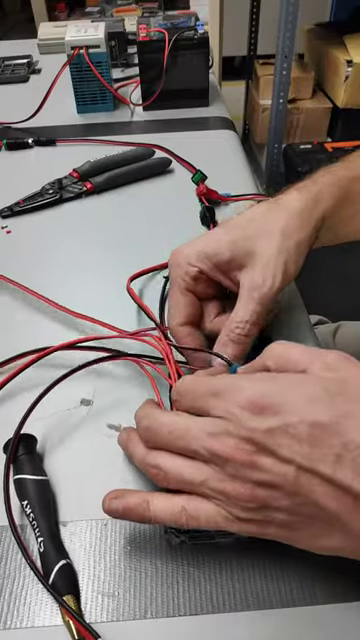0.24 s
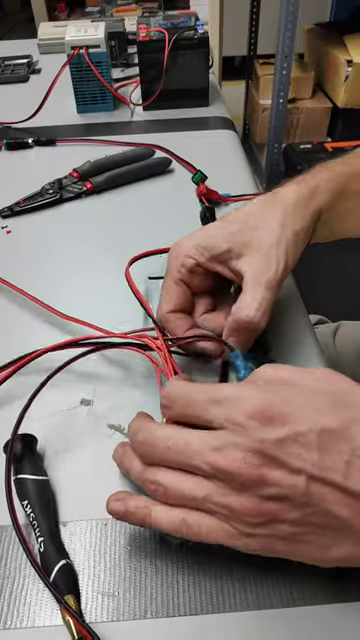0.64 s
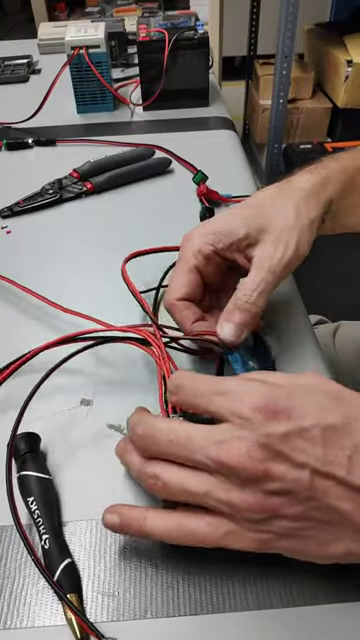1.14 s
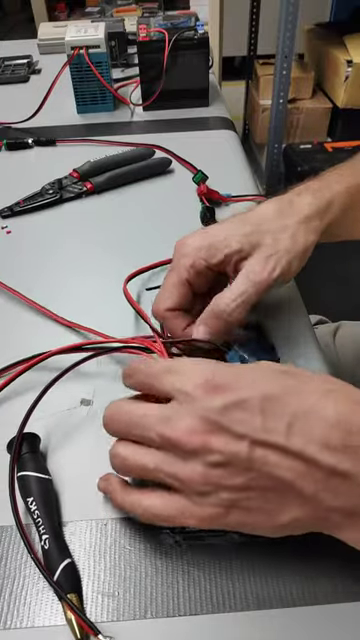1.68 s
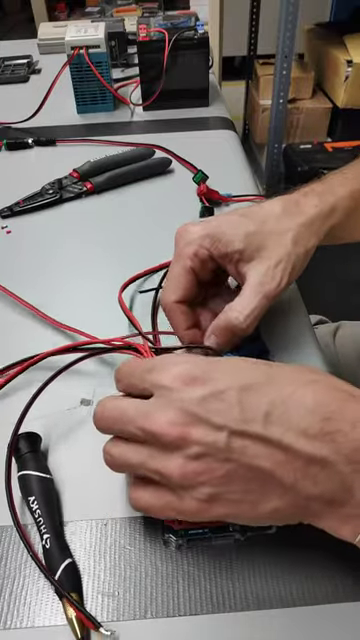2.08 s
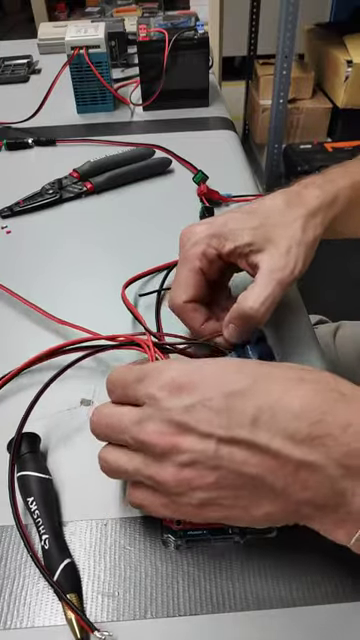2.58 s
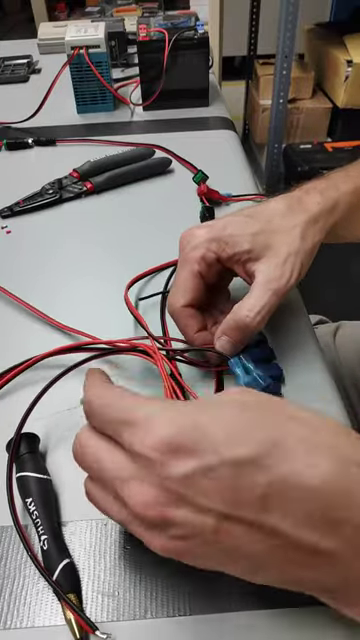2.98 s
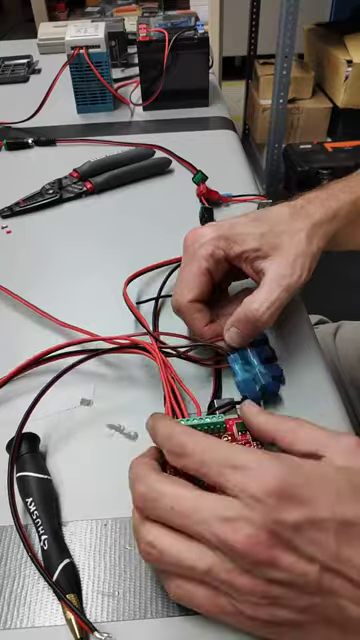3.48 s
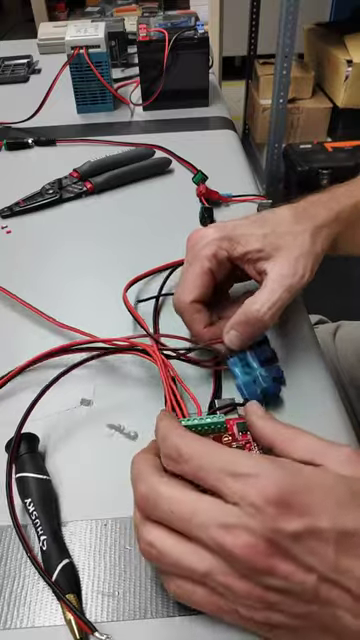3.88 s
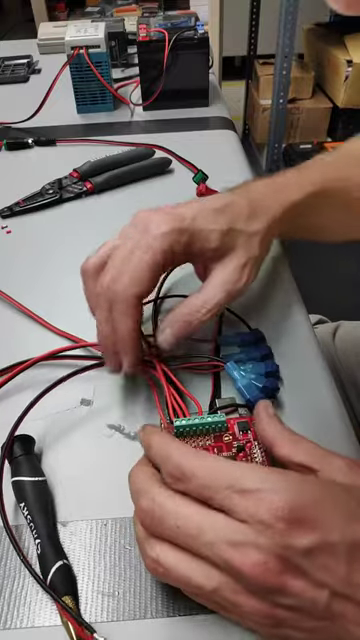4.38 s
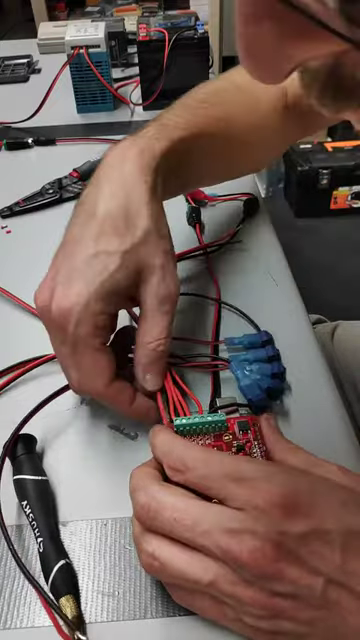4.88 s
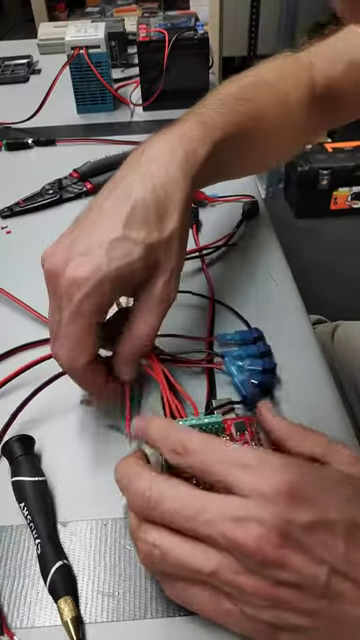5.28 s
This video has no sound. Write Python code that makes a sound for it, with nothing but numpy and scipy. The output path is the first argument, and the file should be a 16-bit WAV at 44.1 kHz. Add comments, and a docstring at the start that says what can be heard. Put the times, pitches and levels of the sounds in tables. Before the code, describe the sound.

Close, quiet wire handling at a bench: thin squeaky rubs, soft board knocks, then one crisp click, over steady humming room tone.

```python
"""Ventilation rumbles in a quiet workshop, the mains hum and a small cooling fan whines, slowly gaining speed.
Close to a phone, fingers rub insulated wires with a thin, high squeak; then come duller wire drags.
Near the end, wire ends tick against a terminal block: a snap and a short decaying ring.
Now and then, mostly near the end, the circuit board knocks on the bench top: damped modes struck and scraped.
Rubs and drags are friction noise, fan and hum sums of sines, the ventilation noise partly alike in both channels."""
import sys
import numpy as np
from scipy import signal
from scipy.fft import rfft, irfft
from scipy.io import wavfile

SR = 44100
rng = np.random.default_rng(int(sys.argv[2]) if len(sys.argv) > 2 else 0)


def int16_out(signal):
    """Quantize to a 16-bit WAV file."""
    q = np.round(np.clip(np.atleast_2d(signal).T, -1, 1) * 32767)
    wavfile.write(sys.argv[1], SR, q.astype(np.int16))


N = 244314
TIME = np.arange(N) / SR
FREQ = np.fft.rfftfreq(N, 1 / SR) + 1e-3  # the offset keeps logarithms and divisions finite at 0 Hz


def undb(db):
    """Level in decibels to amplitude ratio."""
    return 10 ** (np.asarray(db) / 20)


def over_frequency(table):
    """Spectral envelope: each column after the frequency, interpolated on a log-frequency axis."""
    hz, *columns = np.transpose(table)
    return np.array([np.interp(np.log(FREQ), np.log(hz), column) for column in columns])


def walk(rate_hz):
    """Low-passed Gaussian noise: a smooth random drift of unit spread, about rate_hz changes a second."""
    low_pass = np.exp(-(FREQ / rate_hz) ** 2)
    drift = irfft(rfft(rng.standard_normal(N)) * low_pass, N)
    return drift / drift.std()


def decay(age, t60):
    """Exponential decay of free vibration: amplitude falls by 60 dB in t60 seconds."""
    return np.exp(-np.log(1000) * age / t60)


def resonance(hz, width_hz):
    """Complex frequency response of one damped resonator, of unit gain at its centre."""
    return 1 / (1 + 1j * (FREQ ** 2 - hz ** 2) / (FREQ * width_hz))


def ports(contact_sound):
    """Linear filtering: close contacts excite the resonances of the two microphone ports."""
    # colour of small close contacts at each port: (frequency [Hz], left [dB], right [dB])
    port_colour = [(2000, -40, -34), (4500, -36, -28), (5670, -29, -14), (7160, -35, -2.5), (7920, 2, 7),
                   (8400, -7.5, -4), (10300, -12, -5.5), (11300, 0.5, -20), (12800, -1, -13),
                   (15300, -1.5, -24), (17000, -14, -32)]
    db = over_frequency(port_colour)
    mean_power_db = 10 * np.log10(np.mean(undb(db) ** 2))  # over both ports, so white noise keeps its power
    return irfft(rfft(contact_sound) * undb(db - mean_power_db), N)


def stroke(start_s, length_s, rise=0.53, flank=0.81):
    """Velocity envelope of one rub or drag, 0-1: it swells for the share rise, then eases off."""
    top_s = start_s + length_s * rise
    ramp = np.interp(TIME, [start_s, top_s, start_s + length_s], [0, 1, 0])
    return np.sin(np.pi / 2 * ramp) ** flank


def wire_friction(grain_db=2.0, slip_db=2.2, left_db=-4, right_db=-2.5,
                  squeak_hz=13600, squeak_width_hz=1100, squeak_lift=2.8):
    """Dry friction of fingers on wires and of wires dragged along: fine grains in uneven slips.

    Finger rubs squeak with a thin, high edge; wire drags are duller."""
    # finger rubs, then wire drags from 4.5 s on:
    # (start [s], length [s], level before the channel gains [dB], squeaking power share [0-1])
    rubs_and_drags = [(.75, .22, -71, .8), (1.29, .13, -69, .8), (1.48, .2, -69, .9), (1.768, 0.4, -69, 1),
                      (2.96, .11, -73, .4), (3.29, 0.22, -70, .8), (3.52, .11, -69, .7),
                      (4.01, .09, -72, .6), (4.53, .055, -61, 0.1), (5.01, .07, -63.5, 0),
                      (5.378, 0.24, -63.5, 0.1)]
    dull, squeaky = np.zeros((2, N))
    for start_s, length_s, db, squeak in rubs_and_drags:
        speed = undb(db) * stroke(start_s, length_s)
        dull += np.sqrt(1 - squeak) * speed
        squeaky += np.sqrt(squeak) * speed

    # the fingers never rest: faint brushing at -81 dB, 6 dB spread, about 6 changes a second
    brush = undb(-81 + 6 * walk(6))
    dull = np.hypot(dull, brush)

    roughness = undb(grain_db * walk(270) + slip_db * walk(35))
    rub, catch = rng.standard_normal((2, 2, N)) * roughness
    edge = 1 + squeak_lift * abs(resonance(squeak_hz, squeak_width_hz)) ** 2
    squeaking = irfft(rfft(catch * squeaky) * edge / edge.mean(), N)
    return ports(rub * dull + squeaking) * undb([[left_db], [right_db]])


def ticks(snap=1.14, tail_db=-29, tail_t60=0.19, body_hz=6000, body_width_hz=3000):
    """Impact excitation: a sharp snap and a ring of milliseconds, with a faint scatter off the bench."""
    # wire ends on terminals, before filtering:
    # (time [s], level [dB], left minus right of ring [dB], plastic body re tick [dB])
    wire_ticks = [(4.6153, -49.5, -10, -7), (5.0175, -55, 8, -13), (5.036, -52, -9, -14),
                  (5.1433, -41, -0.5, 1), (5.1915, -52, -3, 7), (5.2243, -26.5, 3, -28),
                  (5.2355, -50, -5, -10)]
    # a hard tick springs clear at once, a soft one lingers: the ring doubles for each 30 dB softer
    ref_t60, ref_db, doubling_db = 0.0045, -31, 30
    metal, plastic = np.zeros((2, 2, N))
    age = TIME[:SR // 5]
    for start_s, db, pan_db, body_db in wire_ticks:
        ring_t60 = ref_t60 * 2 ** ((ref_db - db) / doubling_db)
        envelope = decay(age, ring_t60) + undb(tail_db) * decay(age, tail_t60)
        tick = envelope * rng.choice([-1, 1], (2, len(age)))
        tick[:, 0] = [2 * snap, snap]  # the first wavefront strikes the left port harder
        tick *= undb([[db + pan_db / 2], [db - pan_db / 2]])
        start = int(start_s * SR)
        metal[:, start:start + len(age)] += tick
        plastic[:, start:start + len(age)] += tick * undb(body_db)
    body = irfft(rfft(plastic) * resonance(body_hz, body_width_hz), N)
    return ports(metal) + body


def knocks(scrape=0.16):
    """Modal excitation: a soft nudge, then a short scrape, ring the damped modes of the hand-held board."""
    # board nudged or dragged on the bench: (time [s], level of the push [dB], scrape 1/e decay time [s])
    board_knocks = [(0.592, -53.5, 0.0024), (1.43, -56.5, 0.0068), (4.602, -62, 0.045), (4.637, -63, 0.028),
                    (4.863, -64, 0.034), (5.193, -47.5, 0.00075), (5.236, -55.5, 0.0061)]
    # modes of the board: (frequency [Hz], t60 [s], left [dB], right [dB])
    board_modes = [(610, 0.049, -7, -8), (1306, 0.017, 7, -8), (1520, 0.0059, 2, 0), (2020, 0.01, -11, -5),
                   (2870, 0.01, -17, -20), (3780, 0.0094, -11, -5), (4930, 0.014, -6, -11)]
    age = TIME[:SR // 5]
    body = np.zeros((2, len(age)))
    for hz, t60, left_db, right_db in board_modes:
        body += undb([[left_db], [right_db]]) * np.sin(2 * np.pi * hz * age) * decay(age, t60)

    out = np.zeros((2, N))
    for start_s, db, scrape_s in board_knocks:
        push = scrape * rng.standard_normal(len(age)) * np.exp(-age / scrape_s)
        push[0] = 1  # the nudge
        knock = signal.fftconvolve(body, push[None], axes=1)[:, :len(age)]
        start = int(start_s * SR)
        out[:, start:start + len(age)] += undb(db) * knock
    return out


def fan(waver_db=0.57, waver_hz=0.9, flutter_rad=0.11, flutter_hz=7.8):
    """Harmonics of shaft rotation; each wavers and shifts as the moving arm changes its path to each port."""
    # tones, as mean levels before the arm moves: (multiple of the shaft rate, left [dB], right [dB],
    # phase lead of the left [rad], change at full reach: left [dB], right [dB])
    shaft_tones = [(1, -57.5, -60, 0, 0, 1), (3, -65, -81, 2.5, 1.5, 0), (4, -66.5, -64.5, 0.56, 1, -5),
                   (5, -59.5, -66.5, 1.32, -6, 5), (7, -64, -81, -1, -2, -2), (8, -73, -92, -3, -3, -4),
                   (9, -75.5, -77, -1.4, 1, -1), (13, -88, -80.5, -0.6, -1.5, -1)]
    shaft_hz, rise_hz_per_s = 173.25, 0.235  # the fan gains speed evenly
    turns = np.cumsum(shaft_hz + rise_hz_per_s * TIME) / SR
    # the right arm reaches across the bench in one move
    reach_start_s, reach_length_s = 3.75, 1.2
    reach = np.clip((TIME - reach_start_s) / reach_length_s, 0, 1)
    out = np.zeros((2, N))
    for order, left_db, right_db, lead, left_shift_db, right_shift_db in shaft_tones:
        phase = 2 * np.pi * (order * turns + rng.random()) + flutter_rad * walk(flutter_hz)
        left_level_db = left_db + left_shift_db * reach + waver_db * walk(waver_hz)
        right_level_db = right_db + right_shift_db * reach + waver_db * walk(waver_hz)
        out[0] += undb(left_level_db) * np.sin(phase + lead)
        out[1] += undb(right_level_db) * np.sin(phase)
    return np.sqrt(2) * out  # levels are RMS


def mains(mains_hz=60.01, waver_db=1.0, waver_hz=3.0):
    """Harmonics of the alternating current: transformer hum of fixed pitch, wavering slightly in level."""
    # hum, as mean levels: (multiple of the mains rate, left [dB], right [dB], phase lead of the left [rad])
    hum_tones = [(2, -61.5, -63, -0.088), (6, -57.5, -55.5, -0.59)]
    out = np.zeros((2, N))
    for order, left_db, right_db, lead in hum_tones:
        phase = 2 * np.pi * (order * mains_hz * TIME + rng.random())
        swell = np.sqrt(2) * undb(waver_db * walk(waver_hz))  # levels are RMS
        out[0] += swell * undb(left_db) * np.sin(phase + lead)
        out[1] += swell * undb(right_db) * np.sin(phase)
    return out


def room_air():
    """Spatial coherence of ventilation noise: long waves reach both ports alike, the hiss is nearly unrelated."""
    # steady air and hiss, before the humps: (frequency [Hz], left [dB per Hz], right [dB per Hz])
    air_spectrum = [(15.3, -79, -73.5), (53, -65, -66.5), (91, -74, -73), (154.7, -68, -67.5),
                    (307, -78, -81), (678, -86.5, -89.5), (1060, -92, -95), (2000, -101.4, -100.4),
                    (4350, -103.6, -103.4), (5340, -109.1, -103.2), (7480, -112.1, -101.5),
                    (8660, -112.1, -109.3), (12300, -108.1, -114.9), (15100, -109.6, -117.4)]
    # narrow humps and dips: (frequency [Hz], width [Hz], left lift [dB], right lift [dB])
    air_humps = [(122, 12.6, 9, 9.5), (804, 44, 3.5, 4.5), (1352, 375, 10.5, 3), (2596, 250, 8.5, 5.5),
                 (2954, 98, 9, -3), (3840, 82, 2.5, 9.5), (5120, 270, 9.5, 6), (5246, 110, 10, 9),
                 (7940, 330, -5, 3), (13500, 1100, -1.5, -2)]
    # likeness of the two channels: (frequency [Hz], correlation [-1 to 1])
    coherence = [(60, 0.99), (150, 1), (290, 0.92), (640, -0.018), (1400, -0.12), (3000, -0.0012)]
    db = over_frequency(air_spectrum)
    for hz, width_hz, left_db, right_db in air_humps:
        detuning = (FREQ - hz) / width_hz * 2
        db += np.array([[left_db], [right_db]]) / (1 + detuning ** 2 / 2) ** 2

    alike = over_frequency(coherence)[0]
    mid, side = rfft(rng.standard_normal((2, N)))
    common = mid * np.sqrt((1 + alike) / 2)
    opposed = side * np.sqrt((1 - alike) / 2)
    pair = np.array([common + opposed, common - opposed])
    return irfft(pair * undb(db) * np.sqrt(SR / 2), N)  # unit noise scaled to unit power per Hz


def scene():
    """Superposition: handling close by, over the fan, the hum and the room air."""
    return wire_friction() + ticks() + knocks() + fan() + mains() + room_air()


def record(dry):
    """Band limiting: the phone cuts the top with a steep elliptic low-pass at 15750 Hz."""
    low_pass = signal.ellip(10, .1, 70, 15750, fs=SR, output="sos")  # order, ripple dB, stopband dB, edge Hz
    return signal.sosfilt(low_pass, dry)


dry = scene()
out = record(dry)
int16_out(out)
```